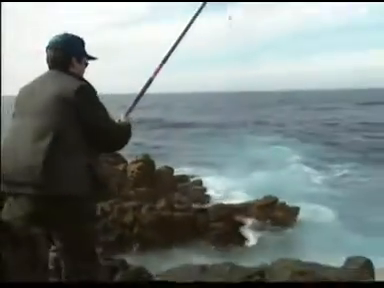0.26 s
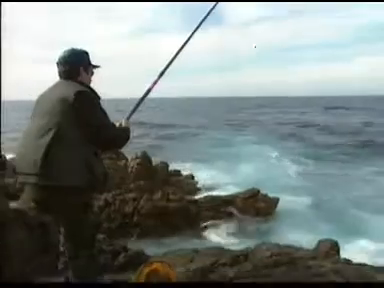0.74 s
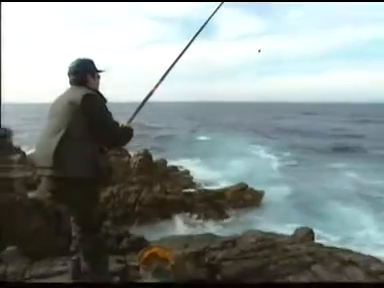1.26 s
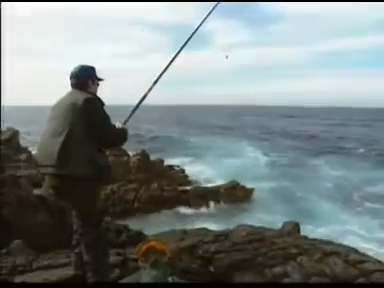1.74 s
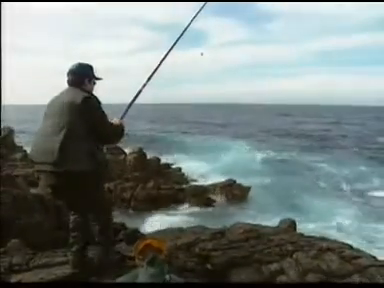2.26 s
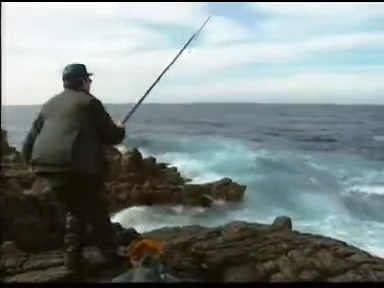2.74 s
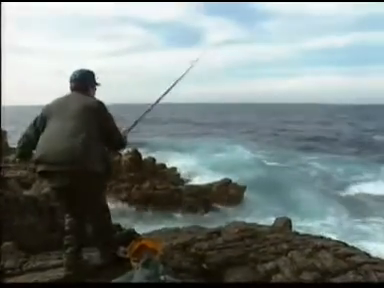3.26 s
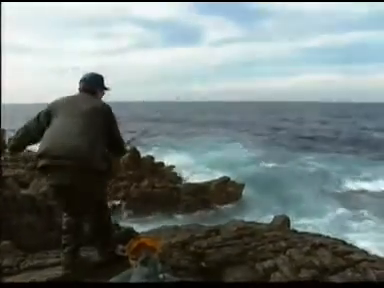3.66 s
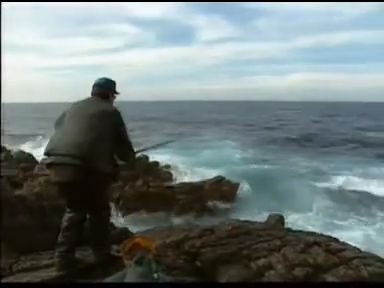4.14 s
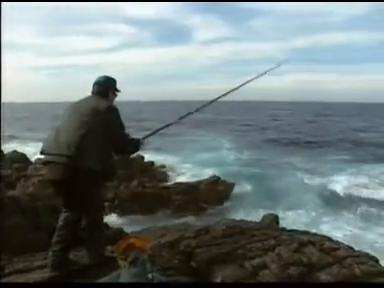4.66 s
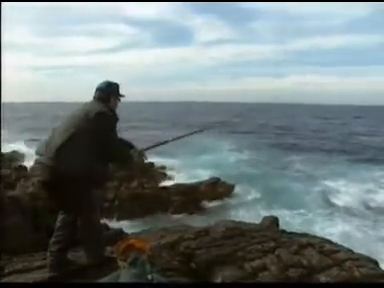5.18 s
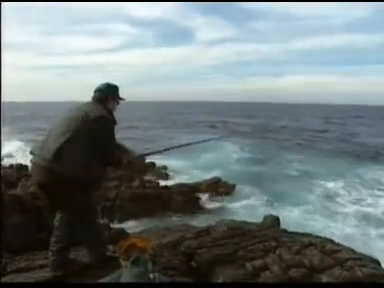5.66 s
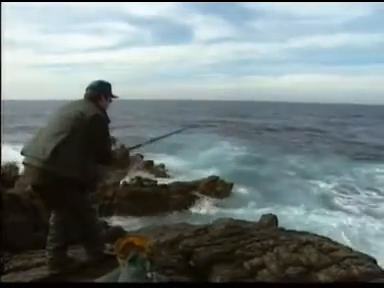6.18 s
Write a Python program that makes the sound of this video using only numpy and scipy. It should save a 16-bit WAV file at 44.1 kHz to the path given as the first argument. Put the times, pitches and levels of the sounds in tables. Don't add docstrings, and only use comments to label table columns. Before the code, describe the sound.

Surf roars and washes over a rocky shore while gusty wind rumbles hard against the microphone, swelling mid-way, with small water slaps nearby.

```python
import sys
import numpy as np
from scipy import signal
from scipy.fft import rfft, irfft, next_fast_len
from scipy.io import wavfile
from scipy.ndimage import uniform_filter1d

SR = 44100
rng = np.random.default_rng(int(sys.argv[2]) if len(sys.argv) > 2 else 0)


def transcribe(u):
    v = np.clip(np.atleast_2d(u).T, -1, 1)
    q = np.round(v * 32767).astype(np.int16)
    wavfile.write(sys.argv[1], SR, q)


def gain_from_db(level_db):
    decades = np.asarray(level_db, float) / 20
    return 10 ** decades


N = 283122

# frequency in Hz, level in dB per Hz.
IDLE_COLOUR = [(12, -10), (100, -29), (300, -45), (800, -2), (1600, 23), (3000, -30)]
# multiple of the throb rate, level in dB rms.
THROB_PARTIALS = [(2, -70), (3, -69), (4, -69), (5, -71)]
# middle in seconds, length in seconds, level in dB.
WHISTLE_LEAKS = [(0.018, 0.053, -48.5), (0.208, 0.039, -45), (.865, 0.047, -43.5), (1.154, .012, -44),
                 (1.211, 0.046, -43.5), (1.289, 0.038, -43), (1.346, .012, -42), (1.463, .03, -44.5),
                 (1.554, 0.034, -42.5), (1.676, 0.013, -44), (1.799, .03, -44)]
# frequency in Hz, level in dB per Hz.
MIST_COLOUR = [(5500, -20), (6500, 0), (7500, -2), (9000, -5), (10500, -8), (16500, -12)]
# start in seconds, peak in dB, length in seconds.
ROCK_SLAPS = [
    (1.346, -43, 0.02),
    (1.759, -46.5, 0.0089),
    (3.483, -38, 0.032),
    (4.195, -35, 0.0099),
    (6.346, -46, 0.022),
    (6.391, -44, 0.022),
]
# frequency in Hz, level in dB per Hz.
BUFFET_COLOUR = [(15, -33), (27, -4), (49, -1.5), (70, 1), (134, -3), (194, -7), (270, -17), (400, -45)]
# time in seconds, buffet level in dB.
MEAN_WIND = [(0, -26), (.6, -32), (.95, -31.5), (1.1, -25), (1.55, -29), (1.9, -26), (2.17, -37.5),
             (2.4, -32), (2.6, -23), (3.0, -20.5), (3.35, -17), (3.65, -18.5), (3.8, -25), (4.7, -28),
             (5.55, -28), (5.8, -20), (5.95, -29.5), (6.42, -28)]
# peak time in seconds, rise in dB.
HARD_EDDIES = [(0.039, 3.5), (.11, 5.5), (0.262, 2.5), (.503, 8.5), (0.663, 6), (0.831, -1), (1.001, 8),
               (1.404, 12), (1.655, 5), (1.799, 4.5), (1.891, 8), (2.032, 9.5), (2.243, 8), (2.469, 6),
               (2.759, 3), (3.077, 8), (3.21, 5), (3.304, 5), (3.717, 4.5), (3.84, 6), (3.95, 6.5),
               (4.067, 9), (4.202, 12), (4.463, 9), (4.632, 3.5), (4.913, 11.5), (5.215, 11.5),
               (5.704, 4.5), (6.029, 6), (6.243, 7.5)]
# frequency in Hz, level in dB per Hz.
ROAR_COLOUR = [(82, -15.5), (140, -1), (242, -1.5), (312, 0), (725, -6), (1200, -19), (1560, -29.5),
               (2640, -120)]
# frequency in Hz, level in dB per Hz.
WASH_COLOUR = [(500, -1), (850, -3), (1260, -3.5), (1640, -9.5), (2270, -12), (3000, -20.5), (3900, -27.5),
               (6600, -120)]
# frequency in Hz, level in dB per Hz.
SPRAY_COLOUR = [(1410, -10), (2400, 1.5), (4830, -9), (6500, -19.5), (8450, -126), (14300, -120)]
# time in seconds, roar level in dB.
FAR_BREAKERS = [(0, -19), (.75, -19), (1.15, -20.5), (1.8, -21.5), (2.05, -22.5), (2.7, -22), (3.4, -21.5),
                (3.6, -21), (3.9, -20), (4.3, -18.5), (4.6, -21.5), (5.1, -19), (5.55, -22), (5.7, -18.5),
                (6.3, -21), (6.42, -14.5)]
# time in seconds, spray level in dB, drained share (1 drained, 0 covered,
# below 0 a fuller wash).
NEAR_WAVE = [(0, -39.5, 0.02), (.7, -41, 0), (1.05, -41, .1), (1.45, -41.5, -.3), (2.1, -41.5, -.2),
             (2.9, -40, -.1), (3.25, -40, -.3), (3.65, -40.5, 0.05), (3.9, -37.5, 0.02),
             (4.35, -38.5, 0.26), (4.5, -40, 0.61), (4.9, -41, 0.01), (5.05, -41.5, 0.99), (5.5, -42, 0.83),
             (6.2, -41, 0.71), (6.42, -42.5, 0.3)]
# peak time in seconds, rise in dB, length in seconds, brightness (0 dull - 1 bright).
WATER_SURGES = [(0.352, 2, 0.012, 0.5), (0.735, 1.5, 0.027, 0.24), (.948, 0, 0.015, 0.13),
                (1.102, 1, .025, .6), (1.368, 3.5, .035, 0.52), (1.778, 1.5, .03, .1),
                (2.274, 3, 0.043, 0.31), (2.845, 2.5, 0.051, 0.47), (3.032, 3, 0.021, 0.51),
                (3.267, 2, 0.025, 0.2), (3.422, 3, 0.053, 0.72), (3.495, 4.5, .028, .7),
                (3.828, 2.5, 0.031, 0.31), (4.336, 1, 0.052, 0.89), (4.696, 1, 0.042, 0.53),
                (4.965, 1, 0.015, 0.18), (6.254, 0, 0.035, .8)]

SCAN_HZ, FIELD_HZ, LEAK_EDGE_S = 15625, 50, 0.004
IDLE_DB, HISS_DB, THROB_HZ = -73.5, -58.5, 25 / 3
RASP_S, RASP_LENGTH_S, RASP_EDGE_S, RASP_DB = 2.072, 0.031, 0.02, -55
MIST_DB, MIST_DRAIN_GAIN_DB, MIST_FOLLOWS_SPRAY = -57, 1, 0.66
EDDY_RISE_S, EDDY_FALL_S = 0.036, 0.026
WASH_OVER_SPRAY_DB, WASH_DRAIN_LOSS_DB, SPRAY_SURGE_SHARE = 10, 3.5, 0.81
TRACK_DB, TREBLE_CROSSTALK_DB = 6.6, -21
RUMBLE_CUT_HZ, TAPE_TOP = 44, 1.27
CONTROL_HOP = 40


def rms_one(x):
    return x / np.sqrt(np.mean(x ** 2) + 1e-20)


def in_time(rows):
    s, *columns = np.transpose(rows)
    return [np.interp(np.arange(N) / SR, s, c) for c in columns]


def fill_in(slow):
    return np.interp(np.arange(N) / CONTROL_HOP, np.arange(len(slow)), slow)


def drift(rate_hz):
    r = np.exp(-2 * np.pi * rate_hz * CONTROL_HOP / SR)
    noise = rng.standard_normal(N // CONTROL_HOP + 2002)
    slow = signal.lfilter([1], [1, -2 * r, r * r], noise)[2000:]
    return fill_in(rms_one(slow))


def bumps(times, heights, rise_s, fall_s):
    age = np.arange(0, N, CONTROL_HOP) / SR - np.array(times)[:, None]
    width = np.where(age < 0, np.reshape(rise_s, (-1, 1)), np.reshape(fall_s, (-1, 1)))
    return fill_in(np.array(heights) @ np.exp(-(age / width) ** 2))


def plateau(middle_s, length_s, edge_s):
    beyond = np.maximum(np.abs(np.arange(N) / SR - middle_s) - length_s / 2, 0)
    return np.exp(-(beyond / edge_s) ** 2)


def white():
    return rng.standard_normal(N)


def bursts(per_s, spread_db):
    sizes = gain_from_db(spread_db * np.minimum(rng.exponential(1, N), 5)) * rng.choice([-1, 1], N)
    return sizes * (rng.random(N) < per_s / SR)


def coloured(source, spectrum):
    size = next_fast_len(N)
    hz, level_db = np.transpose(spectrum)
    grid = np.log(np.fft.rfftfreq(size, 1 / SR) + 1)
    gain = gain_from_db(np.interp(grid, np.log(hz), level_db, left=-90, right=-90))
    return rms_one(irfft(rfft(source, size) * gain, size)[:N])


def band(source, order, low_hz, high_hz):
    sos = signal.butter(order, [low_hz, high_hz], "band", fs=SR, output="sos")
    return signal.sosfilt(sos, source)


def idle_input():
    t = np.arange(N) / SR
    throb = 0
    for multiple, db in THROB_PARTIALS:
        throb = throb + np.sqrt(2) * gain_from_db(db) * np.cos(2 * np.pi * round(multiple) * THROB_HZ * t)
    return gain_from_db(IDLE_DB) * coloured(white(), IDLE_COLOUR) + throb


def leak():
    return sum(gain_from_db(db) * plateau(s, length, LEAK_EDGE_S) for s, length, db in WHISTLE_LEAKS)


def whistle():
    t = np.arange(N) / SR
    pulses = np.exp(3.7 * (np.cos(2 * np.pi * FIELD_HZ * (t - 0.011)) - 1))
    tone = rms_one((0.1 + pulses) * np.sin(2 * np.pi * (SCAN_HZ * t + 0.15 * drift(17))))
    picture_hash = rms_one(band(white(), 8, 15150, 15800))
    return gain_from_db(2.0) * leak() * (tone + gain_from_db(-2.0) * picture_hash)


def rasp():
    hiss = band(white(), 8, 9200, 10800)
    return gain_from_db(RASP_DB) * plateau(RASP_S, RASP_LENGTH_S, RASP_EDGE_S) * rms_one(hiss)


def mist():
    spray_db, drained = in_time(NEAR_WAVE)
    level_db = MIST_DB + MIST_FOLLOWS_SPRAY * (spray_db - spray_db.mean()) + MIST_DRAIN_GAIN_DB * drained
    return gain_from_db(level_db + 0.33 * drift(3.2)) * coloured(white(), MIST_COLOUR)


def slaps():
    t, shape = np.arange(N) / SR, np.zeros(N)
    for s, peak_db, length in ROCK_SLAPS:
        age = np.maximum(t - s, 0) / length
        shape += gain_from_db(peak_db) * age * np.exp(1 - age) ** 2
    return shape * rms_one(band(bursts(6000, 7.6), 3, 700, 3500))


def wind_db():
    s, rise_db = np.transpose(HARD_EDDIES)
    return in_time(MEAN_WIND)[0] + bumps(s, rise_db, EDDY_RISE_S, EDDY_FALL_S)


def buffet(level_db, lumps):
    eddies = coloured(white(), BUFFET_COLOUR)
    own_swell = uniform_filter1d(uniform_filter1d(eddies ** 2, size=1300), size=1300)
    steady = rms_one(eddies / (own_swell + 0.05) ** 0.35)
    return gain_from_db(level_db + 0.46 * lumps) * steady


def sea_db():
    s, rise_db, length, bright = np.transpose(WATER_SURGES)
    bright = np.clip(bright, 0, 1)
    low = bumps(s, 2 * rise_db * (1 - bright), length, length)
    high = bumps(s, 2 * rise_db * bright, length, length)
    spray_db, drained = in_time(NEAR_WAVE)
    wash_db = spray_db + WASH_OVER_SPRAY_DB - WASH_DRAIN_LOSS_DB * drained
    return in_time(FAR_BREAKERS)[0] + low, wash_db + high, spray_db + SPRAY_SURGE_SHARE * high


def surf(roar_db, wash_db, spray_db, surge):
    roar = gain_from_db(roar_db + 0.15 * surge) * coloured(white(), ROAR_COLOUR)
    wash_db = wash_db + 0.14 * surge + 1.1 * drift(1.64)
    wash = gain_from_db(wash_db) * coloured(bursts(14000, 2.2), WASH_COLOUR)
    spray_db = spray_db + 0.13 * surge + 0.1 * drift(1.0)
    spray = gain_from_db(spray_db) * coloured(bursts(18000, 1.4), SPRAY_COLOUR)
    return roar + wash + spray


def scene():
    body = buffet(wind_db(), drift(4.05)) + surf(*sea_db(), drift(17)) + slaps()
    treble = mist() + rasp()
    crosstalk = gain_from_db(TRACK_DB + TREBLE_CROSSTALK_DB) * treble
    left = idle_input() + gain_from_db(HISS_DB) * white() + crosstalk
    return np.array([left, gain_from_db(TRACK_DB) * (body + treble)])


def low_pass(x):
    return signal.sosfilt(signal.butter(12, 15820, fs=SR, output="sos"), x)


def record(dry):
    rumble_cut = signal.butter(6, RUMBLE_CUT_HZ, "high", fs=SR, output="sos")
    track = signal.sosfilt(rumble_cut, dry[1])
    track = track / (1 + np.abs(track / TAPE_TOP) ** 4) ** 0.25
    mix = np.array([dry[0], track + whistle()])
    return low_pass(mix)


dry = scene()
out = record(dry)
transcribe(out)
```